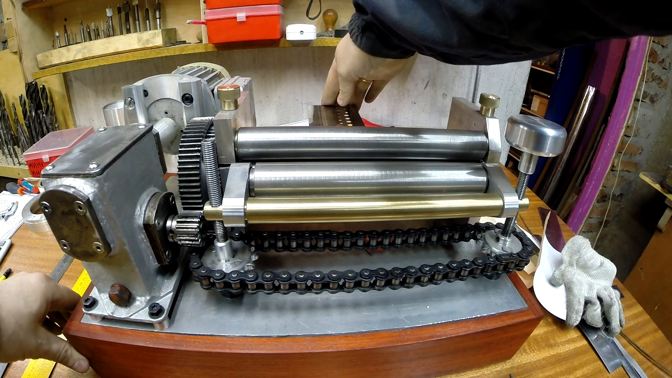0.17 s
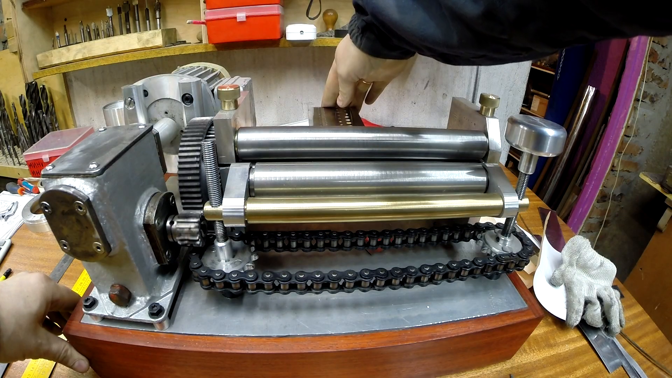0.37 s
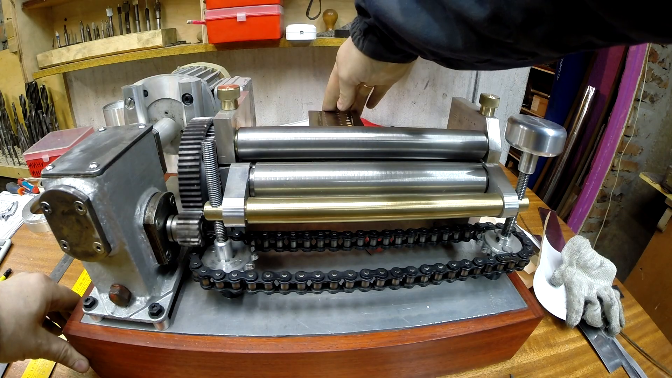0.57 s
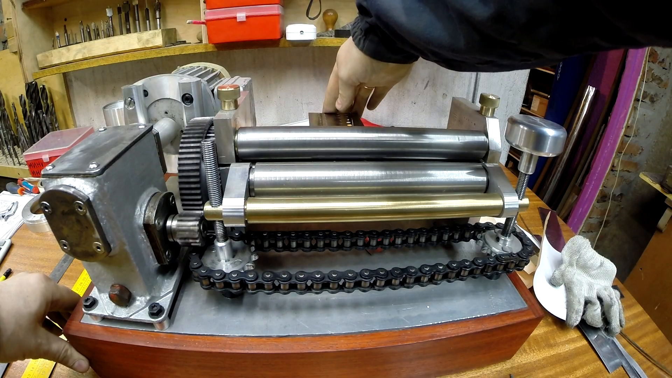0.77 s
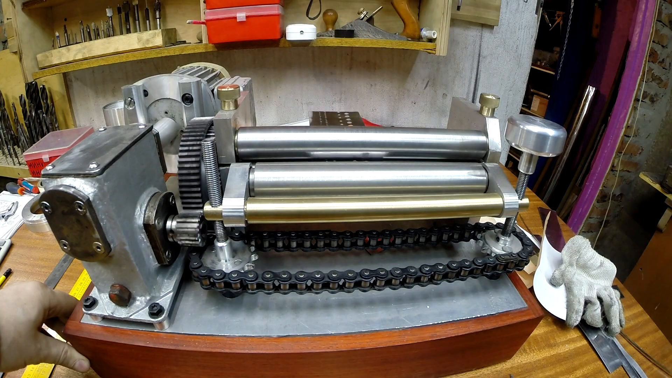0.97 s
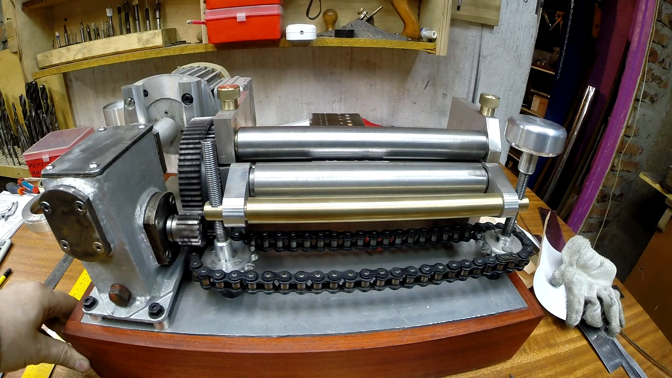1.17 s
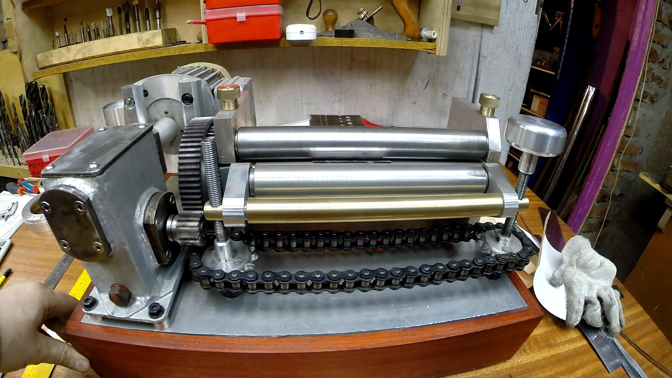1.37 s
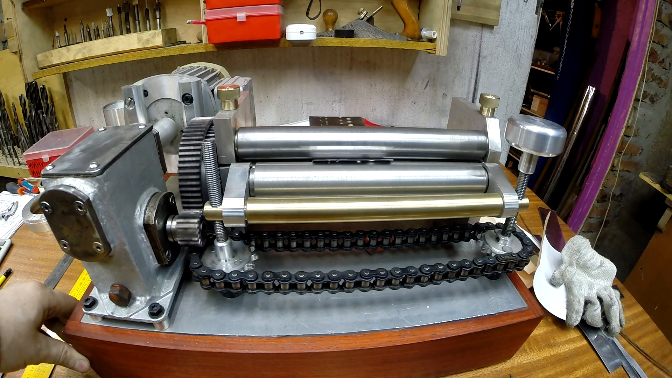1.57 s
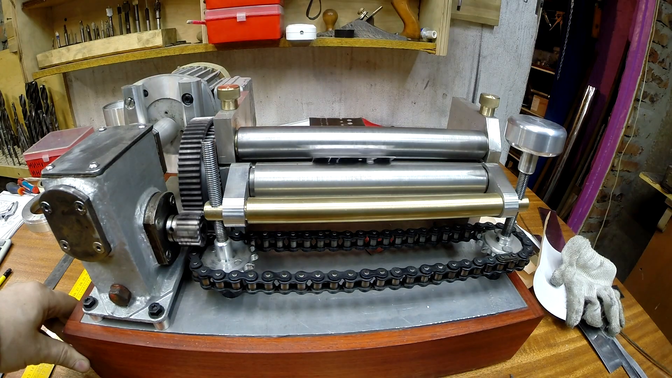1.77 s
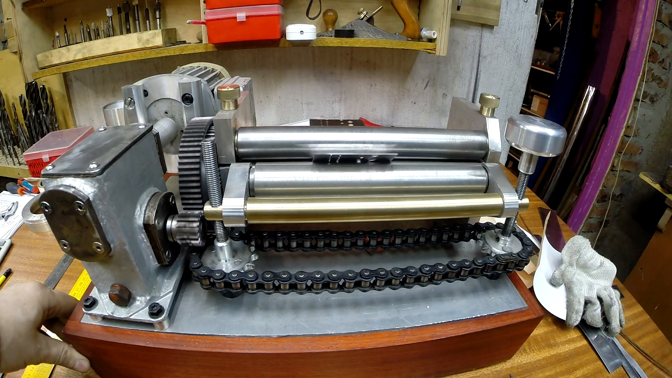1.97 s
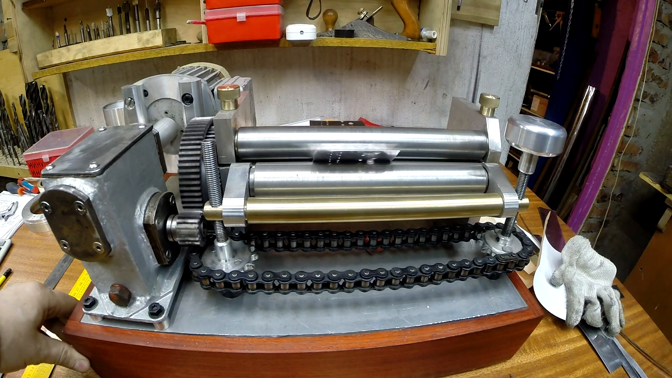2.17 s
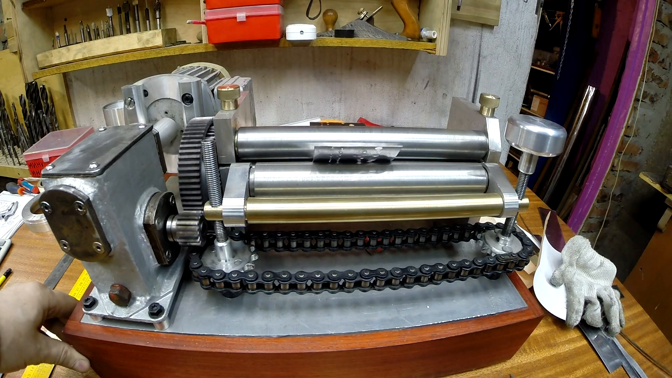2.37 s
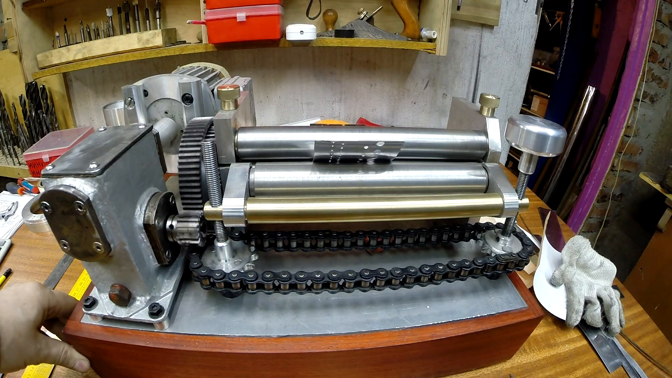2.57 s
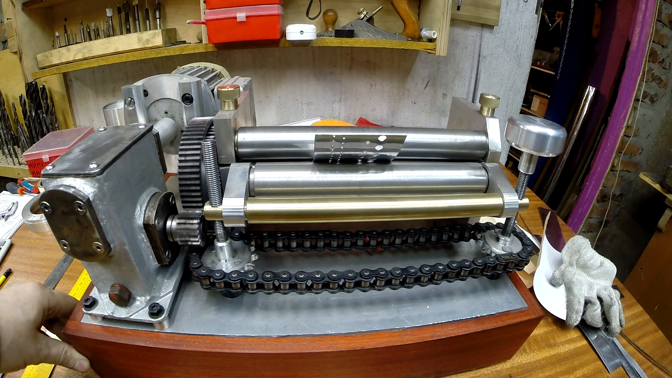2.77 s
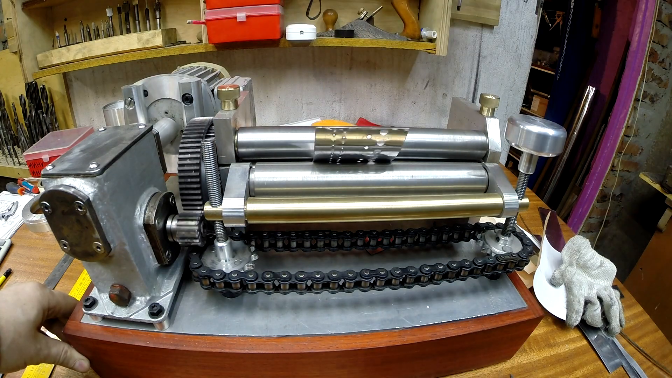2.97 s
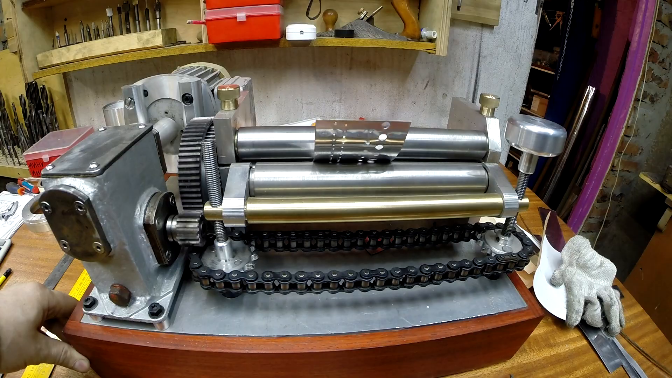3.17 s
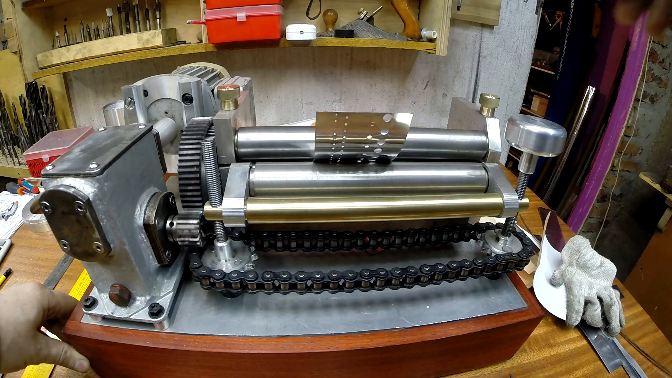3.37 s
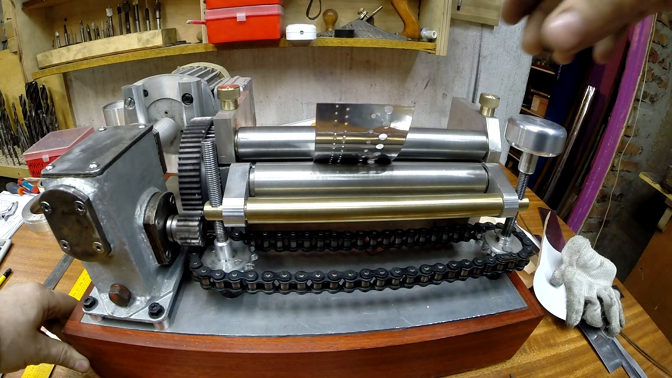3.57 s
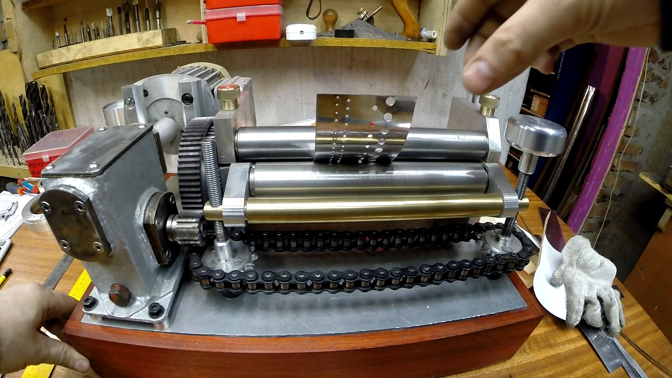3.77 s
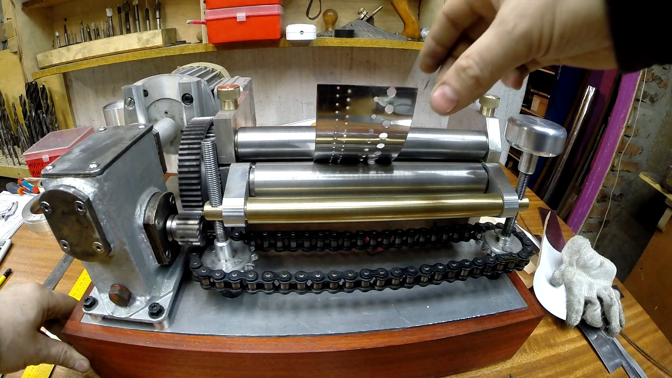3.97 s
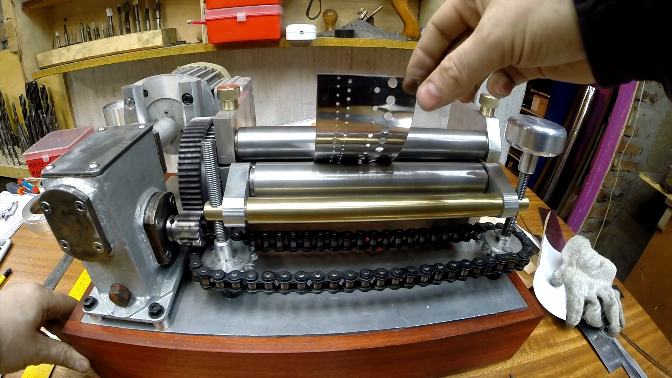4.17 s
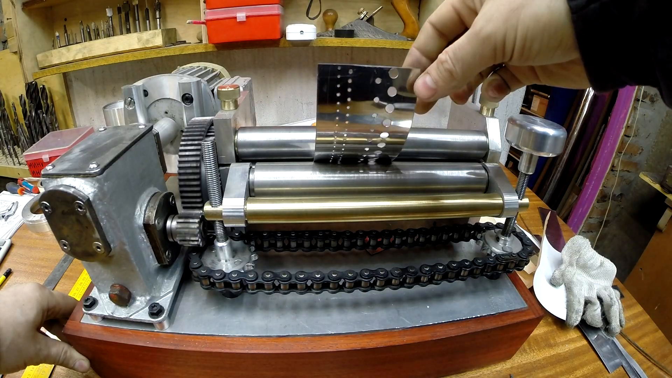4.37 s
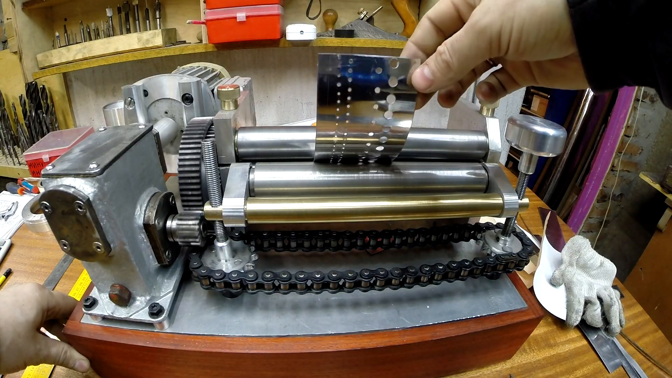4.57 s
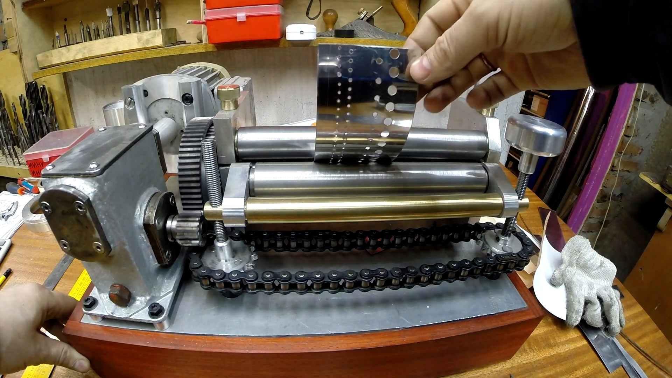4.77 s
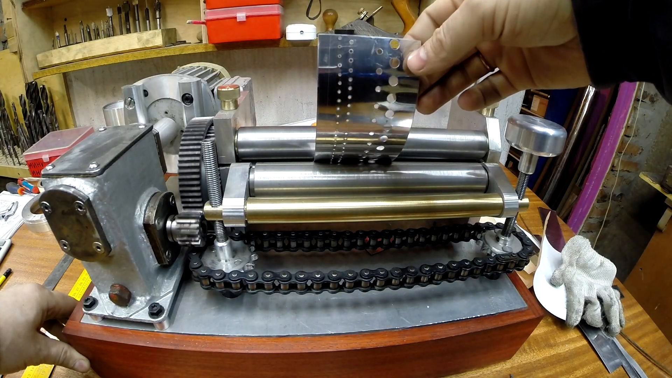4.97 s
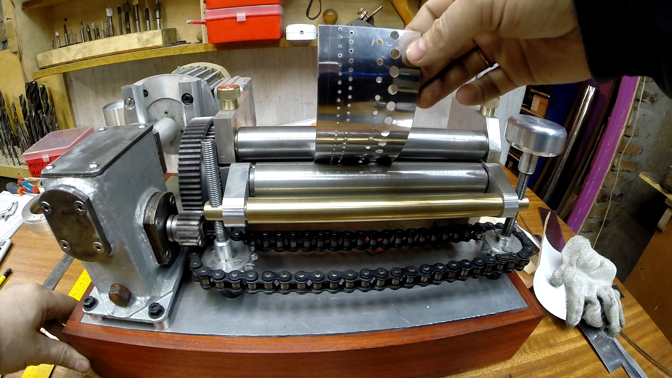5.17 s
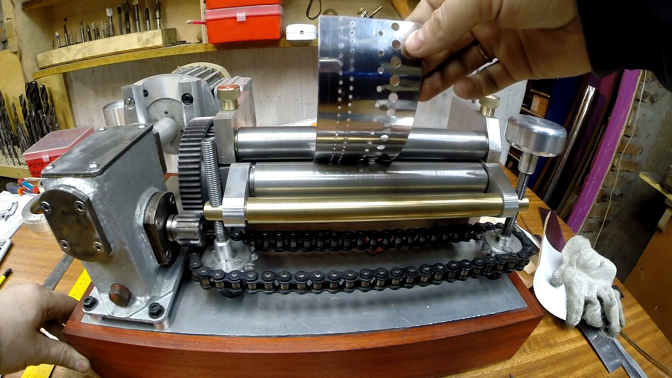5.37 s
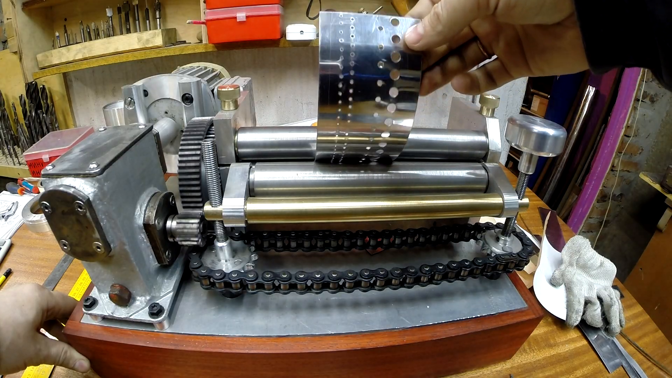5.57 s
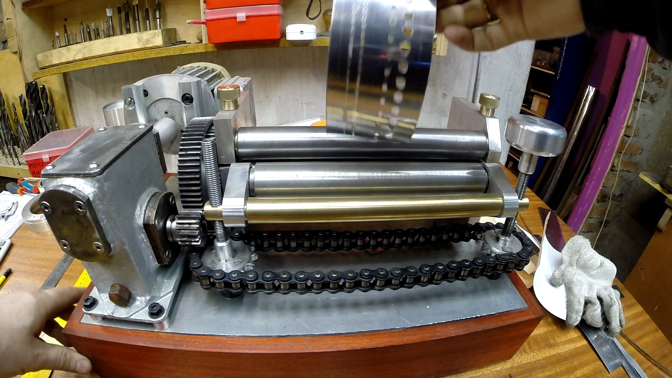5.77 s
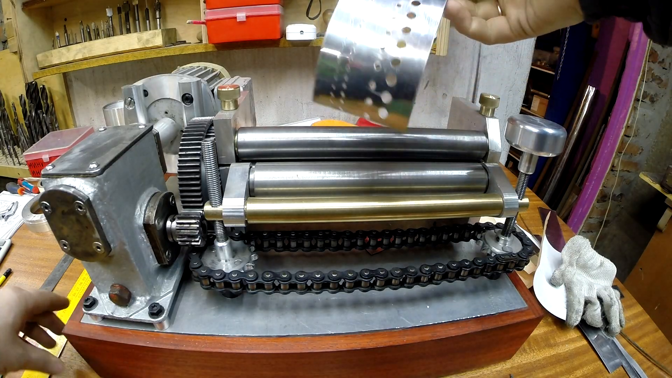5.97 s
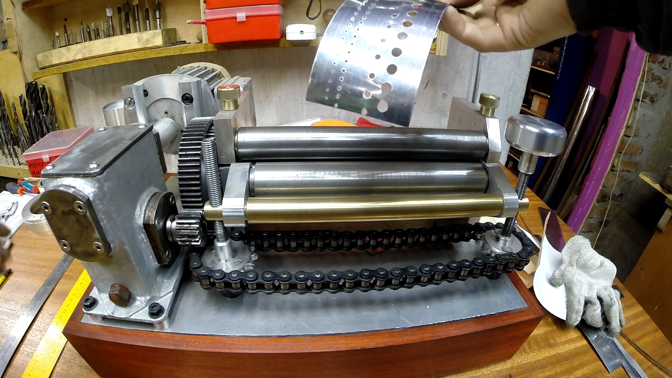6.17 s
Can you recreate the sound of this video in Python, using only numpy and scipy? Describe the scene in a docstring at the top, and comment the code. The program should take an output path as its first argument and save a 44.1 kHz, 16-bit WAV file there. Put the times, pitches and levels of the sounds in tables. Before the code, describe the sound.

Quiet workshop air is broken at about 0.3 seconds by a short electric motor growl and a few metallic clanks as a sheet metal rolling machine starts. It settles into a fast, steady chug and rattle of gears and chain over a low hum and a very faint high whistle. At about 0.9 seconds the rollers bite a thin steel strip with a clink, and the rattle tightens. Irregular knocks and dull thuds run throughout, with faint high chirps from the turning shaft. At about 5.4 seconds the strip snaps free with a sharp double clank and the machine rattles louder and looser. The curled strip gives a faint squeak and a tick around 5.7 seconds as it is lifted off. The motor stops by 5.9 seconds, leaving soft room air and a faint cooling fan. The machine is heard close up in a small room.

```python
"""A home-made slip roller chugs and rattles on a workshop bench, bending a thin steel strip into a ring.
An inverter-fed motor drives a worm box, gears and a chain; their slack knocks several times a turn,
ringing the casing, side plates and rollers. The machine starts empty, bites the strip and rolls it until
it snaps free; the ring squeaks as it is lifted off and the motor stops. Underneath sit the motor's hum,
the inverter's thin whistle, a cooling fan and the air of a small room."""
import sys
import numpy as np
from scipy import signal
from scipy.fft import rfft, irfft, next_fast_len
from scipy.io import wavfile

SR = 44100
rng = np.random.default_rng(int(sys.argv[2]) if len(sys.argv) > 2 else 0)


def unload_audio(sound):
    """Save the sound as a 16-bit wav file, at the path given as the first command line argument."""
    columns = np.transpose(np.atleast_2d(sound))
    # keep every value between -1 and 1, then stretch to whole-number steps
    steps = np.round(np.clip(columns, -1, 1) * 32767)
    wavfile.write(sys.argv[1], SR, steps.astype(np.int16))


N = 274159
TIME = np.arange(N) / SR

# room tone of the workshop: freq_hz, level_db
ROOM_AIR = [(22, 3), (45, -3), (100, -6), (220, 0.5), (450, -8.5), (900, -8), (1300, -19), (4000, -27),
            (10000, -37), (15000, -41)]
# cooling fan tones: pitch_hz, level_db
FAN_TONES = [(263, -59.5), (458, -56.5), (787, -59), (1050, -59.5), (12650, -101)]
# fader rides on the background: time_s, air_db, fan_db
BACKGROUND_FADES = [(0, -57.5, -37), (0.3, -54, -14.5), (5.85, -52, -1.5), (6.2, -52.5, -6)]
# the inverter's weaker side tones at full speed: carrier_offset_hz, level_db
SIDE_TONES = [(-470, -88.5), (-436, -85.5), (-364, -82), (-205, -85), (-151, -81.5), (11, -78.5), (79, -90),
              (152, -78), (203.5, -76.5)]

# motor speed: time_s, turns_per_s
MOTOR_SPEED = [(0.28, 0), (0.341, 25.77), (5.76, 25.77), (5.88, 0)]
# fade of the running machine: time_s, gain
RUN_FADE = [(0.316, 0), (0.325, 1), (5.762, 1), (5.785, .45), (5.82, .28), (5.87, 0)]
# fade of the motor's starting growl: time_s, gain
GROWL_FADE = [(0.222, 0), (0.245, 1), (0.295, .9), (0.325, 0)]
# shaft harmonics, plus a non-harmonic low tone and whine: cycles_per_turn, level_db
HUM_PARTIALS = [(1, -48.5), (6, -48), (8, -35.5), (9, -31.5), (11.07, -25), (17, -48), (18, -48), (19, -46),
                (21, -33), (22, -36), (27, -33), (28, -36), (33, -44), (36, -44), (42, -46), (47.04, -36.5)]
# frame throb, all partials cresting together once a turn: cycles_per_turn, level_db
THROB_PARTIALS = [(10, -40), (11, -40), (12, -26.5), (13, -34), (14, -41)]
# dry spots on the shaft: start_s, end_s, place_turns, half_width_turns, pitch_hz, waver_hz, level_db
DRY_SPOTS = [(0.95, 5.35, 0.85, 0.055, 7080, 50, -63.5), (3.36, 4.02, 0.82, 0.055, 7080, 50, -59.5),
             (1.05, 3.25, 0.91, 0.1, 7620, 70, -67), (1.18, 3.2, 0.75, 0.09, 11900, 130, -74.5),
             (1.3, 3.2, 0.76, 0.09, 12700, 130, -75.5)]

# ringing bodies: pitch_hz, bandwidth_hz, level_db
FRAME_MODES = [(104.5, 8.4, -8.5), (174.4, 6.1, -24), (223.8, 19.6, -8), (288.7, 21.3, 2), (307, 24.3, 3),
               (331.7, 23, 5.5), (375, 19, -10)]  # frame and wooden base
GEAR_MODES = [(432, 148, -10), (542, 71, -5), (592.6, 62, 0), (720.6, 64, 2), (832, 80, -4.5),
              (891, 93, -8.5), (1035, 137, -10.5), (1185, 126, -9), (1378, 77, -14), (1670, 200, -25.5)]  # gear box and gears
PLATE_MODES = [(2040, 85, 0.5), (2346, 66, 0), (2705, 190, -4), (3048, 250, -4), (3228, 170, -1),
               (3516, 120, -13), (4440, 120, -23.5), (5380, 160, -16)]  # steel side plates
LOADED_ROLLER_MODES = [(1891, 84, 7), (1937, 193, -1), (2745, 110, -12), (5440, 270, -36)]  # rollers pressing on the strip
LOOSE_ROLLER_MODES = [(636, 35, -1.5), (762, 58, 5.5), (864, 40, 9), (985, 110, -1), (1200, 71, -5.5),
                      (1241, 43, -0.5), (1400, 94, -23.5), (3320, 120, -13.5)]  # rollers with nothing between them
STRUCK_ROLLER_MODES = [(2040, 63, 3), (2190, 90, 0), (2400, 92, -5)]  # one roller, struck
BENCH_MODES = [(75, 25, -13), (126, 19, -17), (174, 35, 9), (253, 47, -13.5), (456, 52, -0.5)]  # bench top
STRIP_MODES = [(1050, 44, 13.5), (2040, 36, 4.5), (2260, 170, -2), (2610, 34, -5), (3205, 79, 0),
               (3400, 170, -13), (4400, 120, -21), (7100, 400, -18.5)]  # free steel strip
SLIDING_EDGE_MODES = [(5600, 900, -4), (6860, 51, 15), (7500, 900, -6), (8360, 400, 2), (9400, 640, -7),
                      (10600, 600, -6), (12400, 300, -5), (12900, 80, 2)]  # the ring's edge, sliding
FLICKED_EDGE_MODES = [(3600, 91, 14.5), (4360, 270, 7), (5440, 360, 0), (6960, 700, -17), (8540, 520, -9),
                      (10900, 360, -7), (11900, 600, -19)]  # the ring's edge, flicked

# the ring's edge flicks clear of the roller: time_s, level_db
FLICKS = [(5.71, -25)]
# the drive rocks and bumps against its base: time_s, level_db
BUMPS = [(.397, -15), (.764, -10), (.805, -9), (.879, -16), (1.152, -16), (2.205, -14), (2.338, -15),
         (2.958, -11), (3.036, -14), (3.076, -14), (3.118, -13.5), (3.159, -15), (3.2, -14.5), (3.741, -11),
         (3.821, -13), (3.898, -14.5), (3.936, -14.5), (4.215, -14), (4.479, -15.5), (4.598, -12),
         (4.637, -15), (4.675, -14.5), (5.142, -14), (5.181, -14), (5.219, -11.5), (5.336, -12),
         (5.377, -12.5), (5.44, -15), (5.705, -13.5)]
# sharp knocks as the gears take up slack: time_s, level_db
SLACK_KNOCKS = [(0.483, -19), (0.522, -17), (0.597, -11.5), (1.174, -16), (1.329, -23), (1.441, -27),
                (1.596, -14), (2.105, -19), (2.332, -18), (2.416, -25), (3.112, -11.5), (3.612, -16),
                (3.656, -17), (3.811, -14), (3.965, -13.5), (4.471, -15), (5.587, -18), (5.671, -12),
                (5.751, -10.5)]
# the gears engage with a clank; then the strip is caught, slips and snaps free:
# time_s, gear_db, clink_db, bench_db
LOAD_HITS = [(0.316, -7.5, -35, -30), (0.924, -10, -22, -16), (5.369, -7.5, -16, -30), (5.400, -9, -9, -28)]
# a roller is set ringing: time_s, level_db
ROLLER_PINGS = [(0.315, -29.5), (0.924, -25)]
# loose rollers clank as the drive jerks up to speed: time_s, level_db
ROLLER_CLANKS = [(0.364, -12), (0.407, -7), (0.441, -9.5)]

# the worm's knocks in each turn: place_turns, pitch_hz, swing_hz, level_db
WORM_KNOCKS = [(.15, 690, 50, -23), (.28, 650, 50, -19.5), (.45, 630, 40, -28)]
# the teeth bind and knock harder for a few turns: time_s, boost_db
BINDS = [(1.419, -0.5), (1.811, 1.5), (1.96, 1), (2.14, 3.5), (2.35, 2), (2.579, 1), (2.919, 2), (3.66, 4),
         (4.179, 6), (4.479, 0.5), (4.928, 2), (5.22, 5.5)]
# colour of the bearing grit: freq_hz, level_db
BEARING_GRIT = [(1800, 1), (2300, -9), (3300, -3.5), (3800, -13.5), (4900, -21), (5400, -11), (5900, -20.5),
                (6500, -24.5), (7400, -25.5), (9100, -32.5), (10200, -29.5), (11500, -42), (13200, -40.5),
                (15000, -47)]
# colour of chain links settling on the sprockets: freq_hz, level_db
CHAIN_RUSTLE = [(60, -25), (120, -18.5), (170, -4.5), (300, -4), (400, -7.5), (650, -2.5), (1000, -6),
                (1250, -15.5), (1600, -12.5), (2500, -33.5), (4000, -44.5)]
# gear train contacts in each motor turn: place_turns, clack_db, roller_db
CONTACTS = [(.11, -3, -2), (.24, -1.5, -4), (.34, -6.5, 3), (.46, -4.5, 4.5), (.57, -5, -3.5),
            (0.658, -7.5, 2.5), (0.762, -6, -3.5), (.96, -1, 2.5)]
# the drive's mix under each load: frame_db, clack_db, plate_db, grit_db, loose_db, lag_turns
EMPTY_MIX = (-27.5, -21, -49, -39.5, -32, -0.05)
ROLLING_MIX = (-29.5, -21, -42, -39, -60, 0)
RELEASED_MIX = (-24.5, -18, -36.5, -38.5, -29.5, 0.46)
SURGE_BOOST = (2.5, 2.2, 2, 1.3, 7.8, 0.0603)  # added at the peak of the starting jolt

# cues: the gears engage, the rollers bite, the strip comes free; a load change takes CHANGE_S
ENGAGE_S, BITE_S, RELEASE_S, CHANGE_S = 0.316, 0.922, 5.37, 0.028
TURN_S, WHEEL_TEETH = 1 / 25.77, 20  # one motor turn at full speed; teeth on the worm wheel


def from_db(db):
    """Decibels to gain."""
    return 10 ** (np.asarray(db) / 20)


def rms_one(x):
    """Scales x to rms 1."""
    return x / np.sqrt(np.mean(x ** 2) + 1e-20)


def in_time(rows):
    """The columns of a curve at every sample."""
    times, *columns = np.transpose(rows)
    return [np.interp(TIME, times, column) for column in columns]


def ramp(middle_s, length_s):
    """A fade from 0 to 1 centred on a moment."""
    return np.clip((TIME - middle_s) / length_s + .5, 0, 1)


def swell(middle_s, half_width_s):
    """A bell-shaped envelope of height 1."""
    return np.exp(-((TIME - middle_s) / half_width_s) ** 2)


def drift(rate_hz):
    """A smooth random wobble of rms about 1."""
    hop, run_in = 40, 2000
    r = np.exp(-2 * np.pi * hop * rate_hz / SR)
    noise = rng.standard_normal(N // hop + run_in + 2)
    slow = signal.lfilter([1], [1, -2 * r, r * r], noise)[run_in:]
    return np.interp(np.arange(N) / hop, np.arange(len(slow)), rms_one(slow))


def sine(cycles):
    """A tone of rms 1 with a random starting phase."""
    return np.sqrt(2) * np.sin(2 * np.pi * (cycles + rng.random()))


def clicks(times, db):
    """One click at each time."""
    samples = np.round(np.asarray(times) * SR).astype(int)
    return np.bincount(np.clip(samples, 0, N - 1), from_db(db), N)


def grains(per_s, spread_db):
    """A crackle of tiny random ticks."""
    sizes = from_db(spread_db * np.minimum(rng.exponential(1, N), 4))
    return (rng.random(N) < per_s / SR) * sizes * rng.choice([-1, 1], N)


def coloured(x, spectrum):
    """Shapes x with a smooth EQ curve; rms 1."""
    hz, db = np.transpose(spectrum)
    size = next_fast_len(N)
    bin_hz = np.maximum(np.arange(size // 2 + 1) * SR / size, 1)
    gain = from_db(np.interp(np.log(bin_hz), np.log(hz), db, left=-100, right=-100))
    return rms_one(irfft(rfft(x, size) * gain, size)[:N])


def resonate(x, modes):
    """Rings a body: parallel resonances of alternating sign."""
    out = 0
    for k, (hz, width, db) in enumerate(modes):
        r = np.exp(-np.pi * width / SR)
        poles = [1, -2 * r * np.cos(2 * np.pi * hz / SR), r * r]
        gain = (-1) ** k * from_db(db) * (1 - r * r) / 2
        out += gain * signal.lfilter([1, 0, -1], poles, x + 1e-18)
    return out


def band(x, low_hz, high_hz):
    """A body radiates well only between two edges."""
    return signal.sosfilt(signal.butter(2, [low_hz, high_hz], "band", fs=SR, output="sos"), x)


def body(force, modes, low_hz, high_hz):
    """The band-limited ring of a driven body; rms 1."""
    return rms_one(band(resonate(force, modes), low_hz, high_hz))


def scatter(x, t60_s, wet_db):
    """Adds a dense dying tail of reflections."""
    t = np.arange(int(t60_s * SR)) / SR
    tail = rng.standard_normal(SR)[:len(t)] * from_db(-60 * t / t60_s)
    return x + from_db(wet_db) * signal.fftconvolve(x, tail / np.linalg.norm(tail))[:N]


def strike(times, db, modes, t60_s, wet_db):
    """Hits with a short chatter into a body, scaled to peak at the highest db."""
    sound = resonate(scatter(clicks(times, db), t60_s, wet_db), modes)
    return sound / np.abs(sound).max() * from_db(max(db))


def chatter(force, decay_s):
    """Each push sets a loose part buzzing with a burst of noise."""
    r = np.exp(-1 / (decay_s * SR))
    energy = signal.lfilter([1 - r], [1, -r], force ** 2 + 1e-18)
    return np.sqrt(energy) * rng.standard_normal(N)


def gripped():
    """1 while the strip is between the rollers."""
    return ramp(BITE_S, CHANGE_S) - ramp(RELEASE_S, CHANGE_S)


def surge(rise_s=0.09):
    """The jolt of starting: a quick rise to 1 and a slower decay."""
    age = np.maximum(TIME - ENGAGE_S, 0) / rise_s
    return age * np.exp(1 - age)


def load_mix():
    """Crossfades the drive's levels and lag as it starts empty, rolls the strip and runs on."""
    shares = [1 - ramp(BITE_S, CHANGE_S), gripped(), ramp(RELEASE_S, CHANGE_S), surge()]
    return np.transpose([EMPTY_MIX, ROLLING_MIX, RELEASED_MIX, SURGE_BOOST]) @ np.array(shares)


def rocking_duck(depth_db=-6):
    """A gain that ducks at each bump: the base damps the drone while the drive rocks."""
    rocking = sum(swell(time_s, .03) for time_s, _ in BUMPS)
    return from_db(depth_db * np.minimum(rocking, 1))


def wheel_cycle(turns, crest_s):
    """A slow swing of +-1, once per turn of the worm wheel."""
    return np.cos(2 * np.pi * (turns - np.interp(crest_s, TIME, turns)) / WHEEL_TEETH)


def turns_from(turns, place):
    """Signed distance to the nearest pass of a place on the shaft."""
    return (turns - place + .5) % 1 - .5


def background():
    """The bed: workshop air and the tones of a small cooling fan."""
    air_db, fan_db = in_time(BACKGROUND_FADES)
    fan = sum(from_db(db) * sine(hz * TIME) for hz, db in FAN_TONES)
    return from_db(air_db) * coloured(rng.standard_normal(N), ROOM_AIR) + from_db(fan_db) * fan


def inverter_whistle(pace, carrier_hz=9990.5, pair_offset_hz=311.5):
    """The bare carrier pings, then switching tones fan out from it as the motor gains speed."""
    # the rising strip reflects the two strongest tones
    upright_db = 9 * ramp(3.75, 0.25)  # it stands upright
    glint_db = 10 * swell(3.48, 0.2)  # it clears the top roller
    surge_db = 6.5 * surge()
    pair = [(-pair_offset_hz, -78.5 + surge_db + upright_db),
            (pair_offset_hz, -72 + surge_db + glint_db)]
    carrier, spread = carrier_hz * TIME, np.cumsum(pace) / SR
    ping = from_db(-61.5) * swell(0.318, 0.025) * sine(carrier)
    tones = sum(from_db(db + 1.4 * drift(8)) * sine(carrier + offset_hz * spread)
                for offset_hz, db in pair + list(SIDE_TONES))
    return (ping + pace * tones) * (1 - ramp(5.8, .04))


def motor_hum(turns, pace, running, growl_hz=91.0, throb_place=0.45):
    """Shaft hum and a once-a-turn throb, with a separate beating low tone and a thin whine."""
    shaft = turns + .002 * drift(1.5)
    hum = sum(from_db(db + 1.2 * drift(4)) * sine(order * shaft) for order, db in HUM_PARTIALS)
    throb = sum(from_db(db) * np.sqrt(2) * np.cos(2 * np.pi * order * (shaft - throb_place))
                for order, db in THROB_PARTIALS)
    unloaded_db = -2.5 * (1 - gripped())
    drone = from_db(unloaded_db) * rocking_duck() * (hum + from_db(1.5 * drift(8)) * throb)
    growl_fade, = in_time(GROWL_FADE)  # a short growl as the field builds up
    return from_db(-29.5) * growl_fade * sine(growl_hz * TIME) + running * pace ** 3 * drone


def shaft_chirps(turns, fade_s=0.1):
    """Dry spots on the shaft rub with a tiny high tick at the same place in every turn."""
    out = 0
    for start_s, end_s, place, half_width, hz, waver_hz, db in DRY_SPOTS:
        gate = np.exp(-(turns_from(turns, place) / half_width) ** 2)
        rubbing = ramp(start_s, fade_s) - ramp(end_s, fade_s)
        tone = sine(hz * TIME + np.cumsum(waver_hz * drift(150)) / SR)
        out += from_db(db + 2 * drift(10)) * rubbing * gate * tone
    return out


def ring_lift_off():
    """The finished ring squeaks along the roller, then its edge springs away."""
    scrape = resonate(grains(per_s=9000, spread_db=1.5), SLIDING_EDGE_MODES)
    squeak = from_db(-49.5) * swell(5.665, 0.038) * rms_one(scrape)
    flick = strike(*np.transpose(FLICKS), FLICKED_EDGE_MODES, t60_s=.055, wet_db=7)
    return band(squeak + flick, 3000, 13500)


def base_bumps(pitch_hz=303, half_width_s=.0092):
    """The drive bumps its base: short, round thuds in the frame's low resonance."""
    return sum(from_db(db) * swell(time_s, half_width_s) * sine(pitch_hz * TIME) for time_s, db in BUMPS)


def knocks_and_snaps(clink_send_db=-18, bench_send_db=-42):
    """Each slack knock or change of load layers a bench thump, a gear clank and a steel clink."""
    knocks = [(time_s, db, db + clink_send_db, db + bench_send_db) for time_s, db in SLACK_KNOCKS]
    times, gear_db, clink_db, bench_db = np.transpose(knocks + list(LOAD_HITS))
    thumps = band(strike(times, bench_db, BENCH_MODES, t60_s=0.024, wet_db=0), 60, 920)
    clanks = band(strike(times, gear_db, GEAR_MODES, t60_s=0.04, wet_db=-6), 230, 1400)
    clinks = band(strike(times, clink_db, STRIP_MODES, t60_s=0.047, wet_db=4), 1100, 4500)
    return thumps + clanks + clinks


def roller_hits():
    """A roller pings at the start and the bite; the loose rollers clank as the drive jerks to speed."""
    pings = strike(*np.transpose(ROLLER_PINGS), STRUCK_ROLLER_MODES, t60_s=0.04, wet_db=4)
    clanks = strike(*np.transpose(ROLLER_CLANKS), LOOSE_ROLLER_MODES, t60_s=.05, wet_db=-3)
    return band(pings, 1500, 3000) + band(clanks, 400, 1800)


def worm_chug(turns, knock_half_width_s=.0035):
    """Sliding teeth growl and knock, bending in pitch as the wheel turns and swelling where they bind."""
    wheel = wheel_cycle(turns, crest_s=1.1)
    lag = load_mix()[-1]
    phase = turns - lag - .012 * wheel
    binding_db = sum(db * swell(time_s, 0.077) for time_s, db in BINDS)
    growl_hz = 655 + 45 * wheel + 35 * drift(60)
    chug = from_db(-30 + 2 * drift(30)) * rocking_duck() * sine(np.cumsum(growl_hz) / SR)
    for place, hz, swing_hz, db in WORM_KNOCKS:
        offset_s = turns_from(phase + .005 * drift(5), place) * TURN_S
        pitch_hz = hz + swing_hz * wheel + 32 * drift(7)
        envelope = np.exp(-(offset_s / knock_half_width_s) ** 2)
        chug += from_db(db + 1.8 * drift(12)) * envelope * np.sin(2 * np.pi * pitch_hz * offset_s)
    return from_db(binding_db - 1.5) * chug


def contact_forces(turns, lag, wander_s=.00026):
    """Taps on gears and rollers: each contact recurs every turn, a little uneven in time and weight."""
    each_turn = np.arange(int(turns[-1]))
    slack = np.interp(each_turn, turns, lag)
    unloaded = 1 - np.interp(each_turn, turns, gripped())
    jitter_s = .00012 + .00039 * unloaded  # sloppier with no strip to hold the contacts
    shared_drift = drift(1.2)
    gear_force, roller_force = np.zeros((2, N))
    for place, clack_db, roller_db in CONTACTS:
        times = np.interp(each_turn + place + slack, turns, TIME)
        timing, weight = rng.standard_normal((len(each_turn), 2)).T
        times += wander_s * np.interp(times, TIME, shared_drift + 0.76 * drift(3.03)) + jitter_s * timing
        force_db = .4 * np.interp(times, TIME, drift(5.3)) + 1.3 * weight
        # every contact reaches the casing by a path of its own
        gear_force += scatter(clicks(times, clack_db + force_db), t60_s=.028, wet_db=-7)
        roller_force += clicks(times, roller_db + force_db)
    return gear_force, roller_force


def gear_train(turns, pace, running):
    """Slack contacts rattle gears, rollers and plates over frame rumble, bearing grit and chain rustle."""
    frame_db, clack_db, plate_db, grit_db, loose_db, lag = load_mix()
    grip = gripped()
    gear_force, roller_force = contact_forces(turns, lag)
    tight = wheel_cycle(turns, crest_s=0.56)  # the load swells once per wheel turn
    throb = np.cos(2 * np.pi * (turns - lag - .26))  # rubbing is strongest at the main contact
    empty_throb_db = 3.5 * (1 - ramp(BITE_S, CHANGE_S)) * throb

    rumble = body(grains(per_s=600, spread_db=1), FRAME_MODES, 126, 580)
    frame = from_db(frame_db + 0.6 * tight) * rocking_duck() * rumble
    gears = from_db(clack_db - 7.5 - 0.83 * grip) * body(gear_force, GEAR_MODES, 390, 2700)
    rattle = body(scatter(gear_force, t60_s=0.02, wet_db=1.5), LOOSE_ROLLER_MODES, 560, 2600)
    loose = from_db(loose_db + empty_throb_db) * rattle
    buzz = body(chatter(gear_force, decay_s=0.0042), PLATE_MODES, 1910, 4500)
    plates = from_db(plate_db + 0.36 * tight + empty_throb_db) * buzz
    rollers = from_db(-42.5) * grip * body(roller_force, LOADED_ROLLER_MODES, 1500, 7800)
    grit = coloured(grains(per_s=3500, spread_db=0), BEARING_GRIT)
    bearings = from_db(grit_db - 4.5 + 0.36 * tight + 0.3 * throb) * grit
    rustle = coloured(grains(per_s=900, spread_db=2.5), CHAIN_RUSTLE)
    rough_db = 5 * swell(3.38, 0.073)  # the chain runs rough for a moment
    chain = from_db(clack_db - 12 + 2 * throb + rough_db) * rustle

    stall = from_db(-19 * swell(0.919, 0.0061))  # an instant's gap just before the bite
    mix = pace ** 0.23 * frame + gears + loose + rollers + chain + pace ** 3 * (plates + bearings)
    return running * stall * mix


def scene():
    """The machine close up in a small, cluttered room: clatter with a short tail, tones left dry."""
    speed, = in_time(MOTOR_SPEED)
    running, = in_time(RUN_FADE)
    turns, pace = np.cumsum(speed) / SR, speed / speed.max()
    drive = gear_train(turns, pace, running) + running * worm_chug(turns)
    clatter = drive + base_bumps() + knocks_and_snaps() + roller_hits() + ring_lift_off()
    in_room = scatter(clatter, t60_s=0.22, wet_db=-11)
    tones = shaft_chirps(turns) + motor_hum(turns, pace, running) + inverter_whistle(pace)
    return (in_room + tones + background())[None]


def record(dry):
    """A steep high cut at 15.2 kHz."""
    return signal.sosfilt(signal.ellip(10, .2, 80, 15200, fs=SR, output="sos"), dry)


dry = scene()
out = record(dry)
unload_audio(out)
```